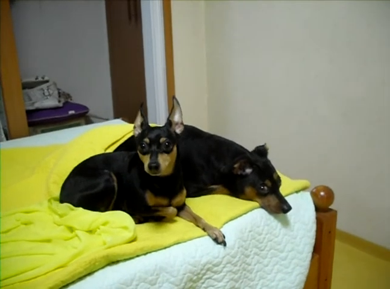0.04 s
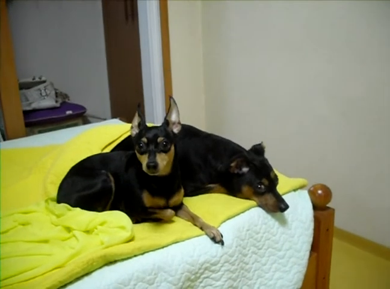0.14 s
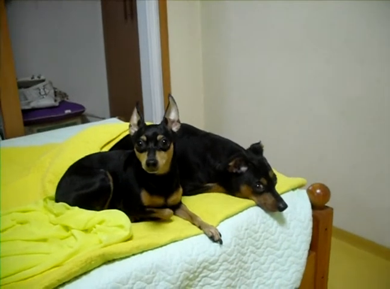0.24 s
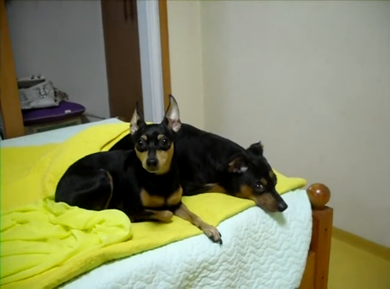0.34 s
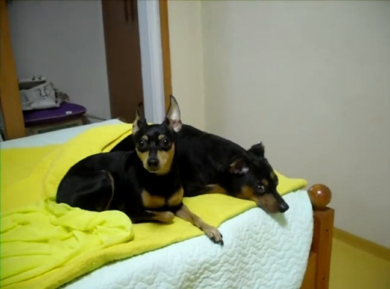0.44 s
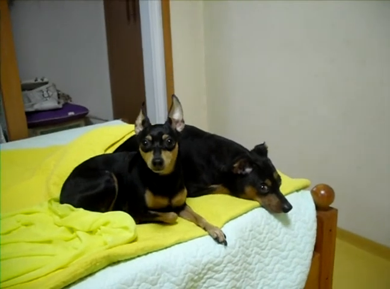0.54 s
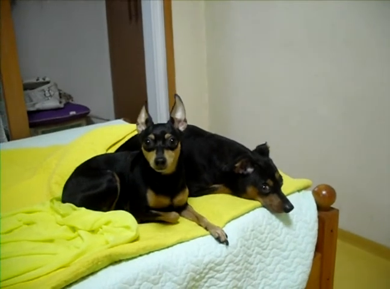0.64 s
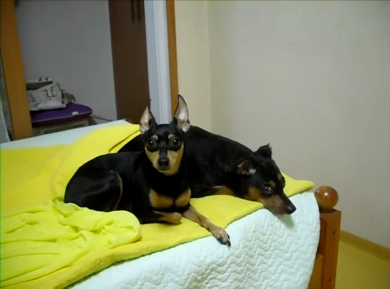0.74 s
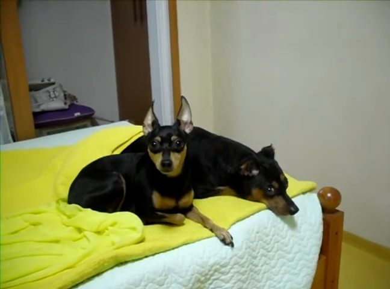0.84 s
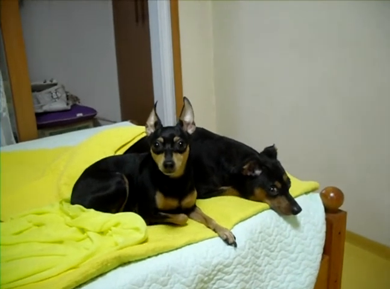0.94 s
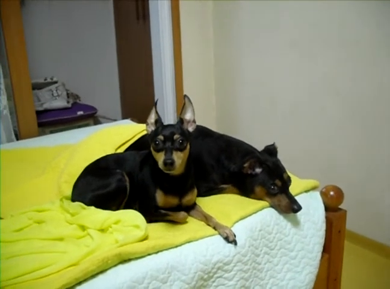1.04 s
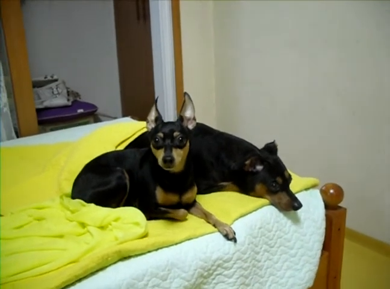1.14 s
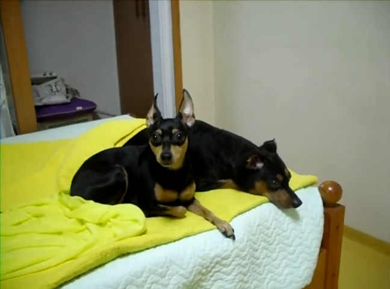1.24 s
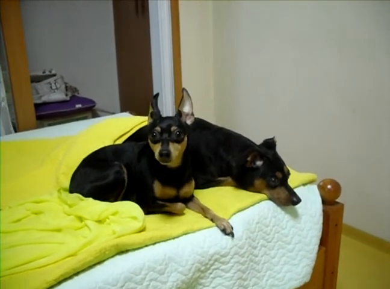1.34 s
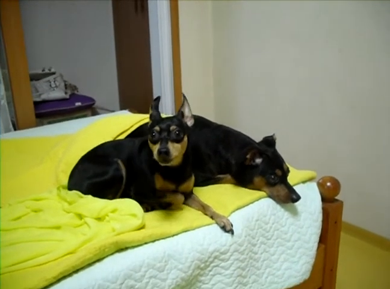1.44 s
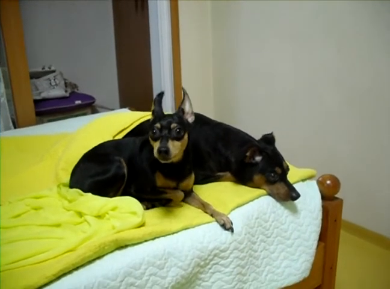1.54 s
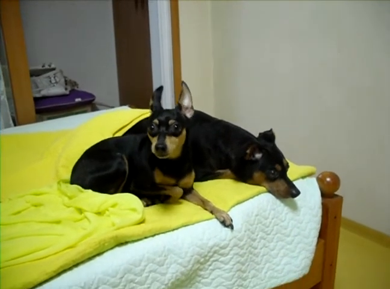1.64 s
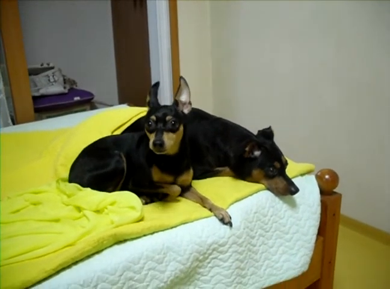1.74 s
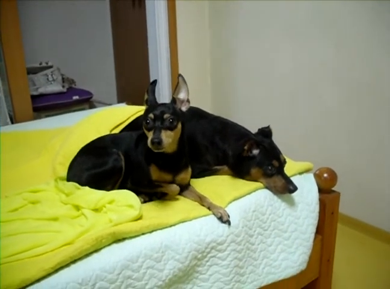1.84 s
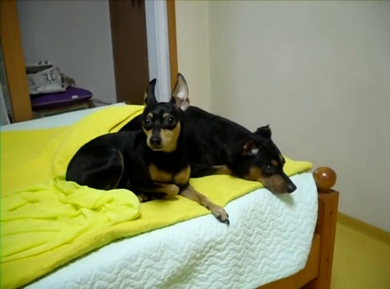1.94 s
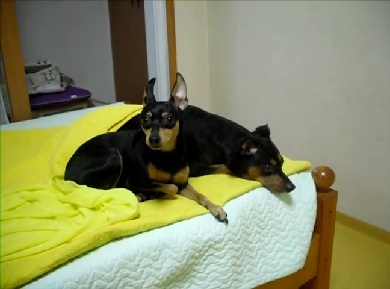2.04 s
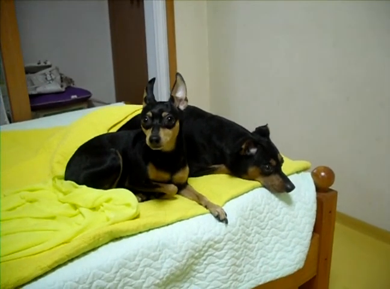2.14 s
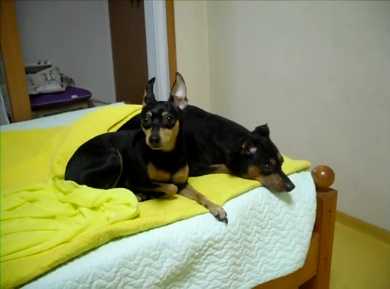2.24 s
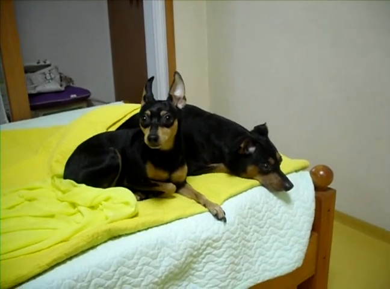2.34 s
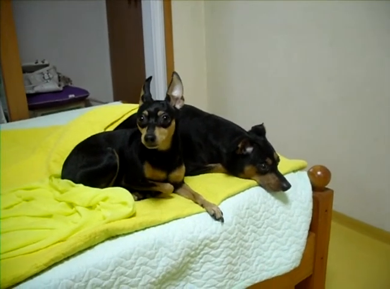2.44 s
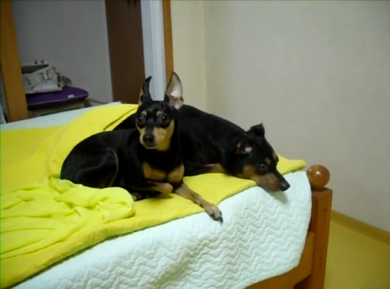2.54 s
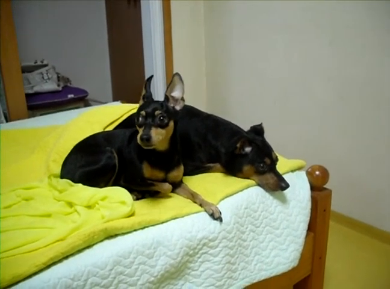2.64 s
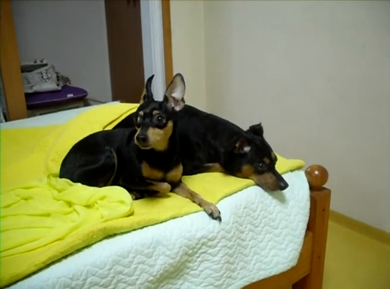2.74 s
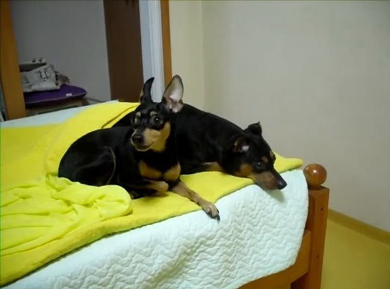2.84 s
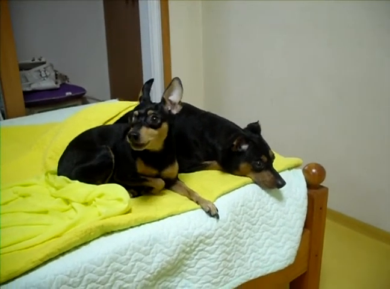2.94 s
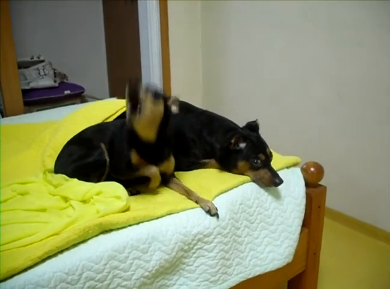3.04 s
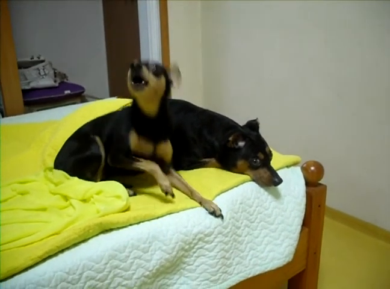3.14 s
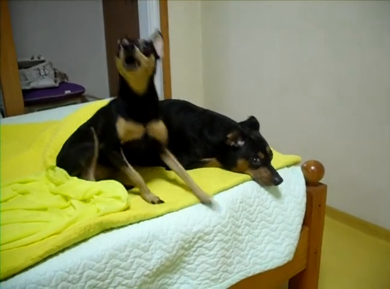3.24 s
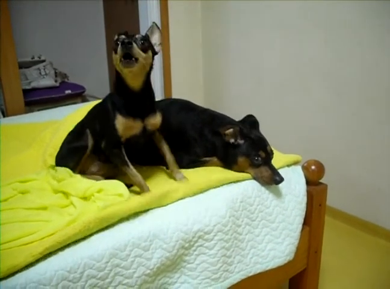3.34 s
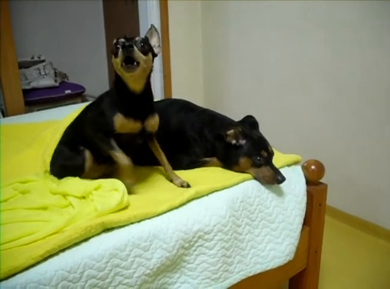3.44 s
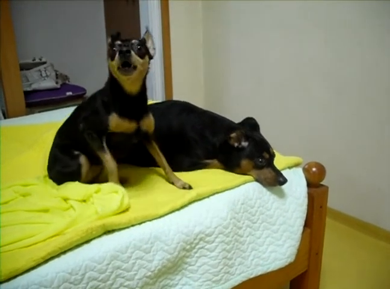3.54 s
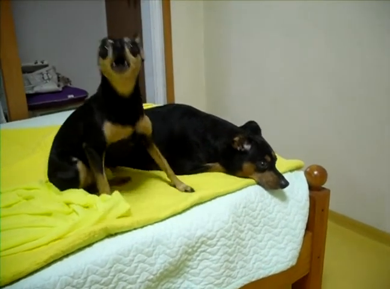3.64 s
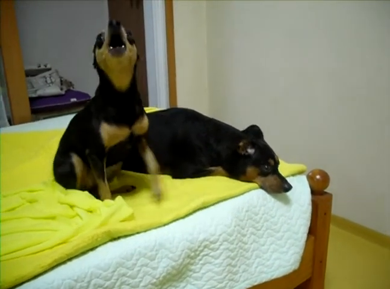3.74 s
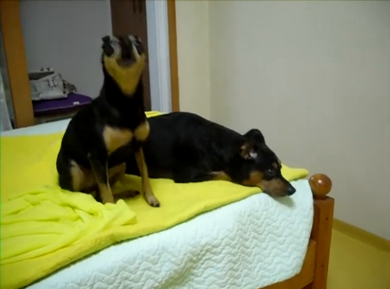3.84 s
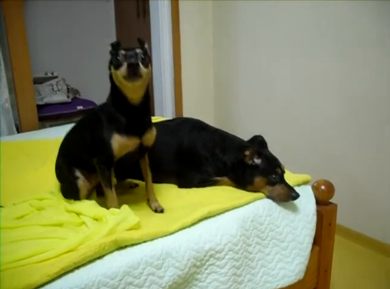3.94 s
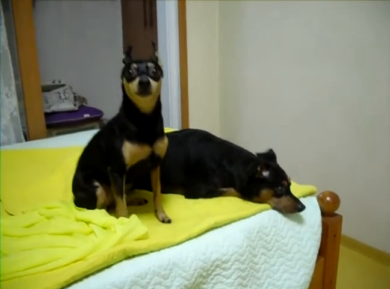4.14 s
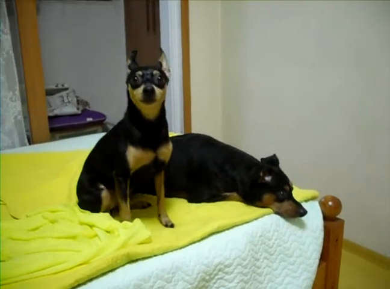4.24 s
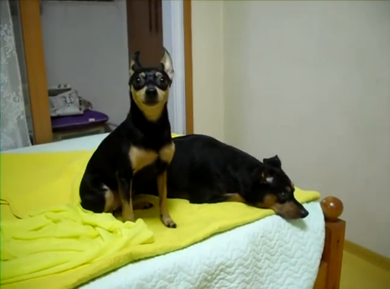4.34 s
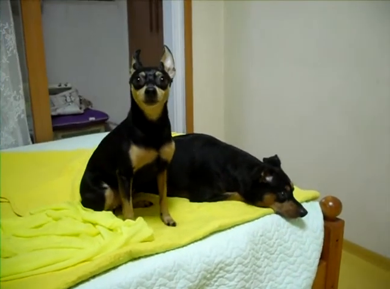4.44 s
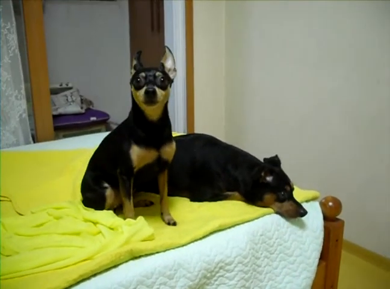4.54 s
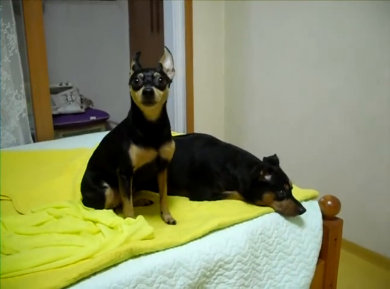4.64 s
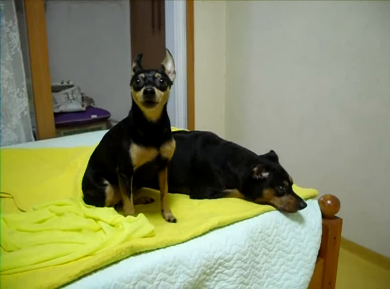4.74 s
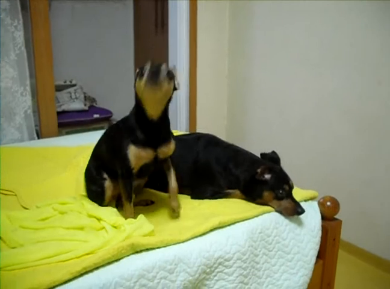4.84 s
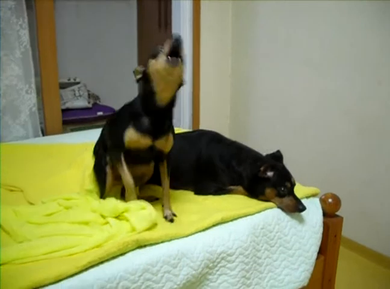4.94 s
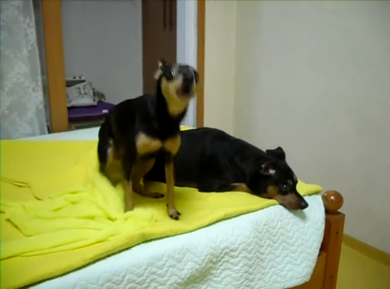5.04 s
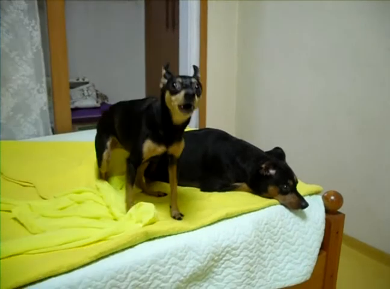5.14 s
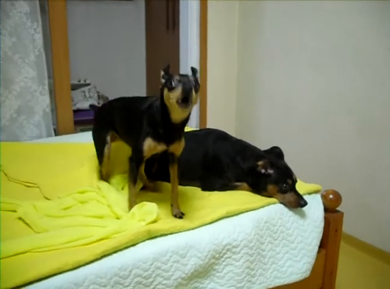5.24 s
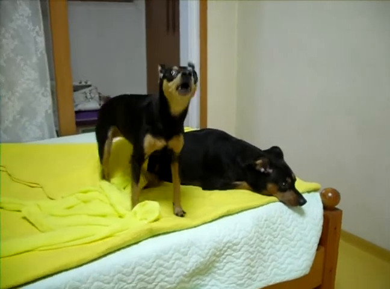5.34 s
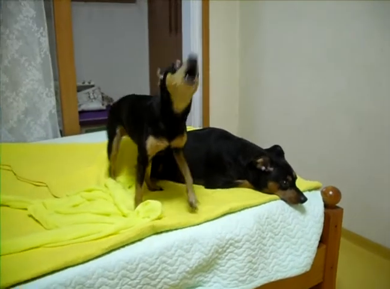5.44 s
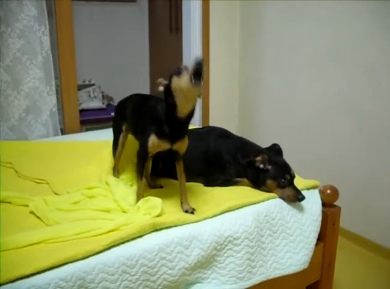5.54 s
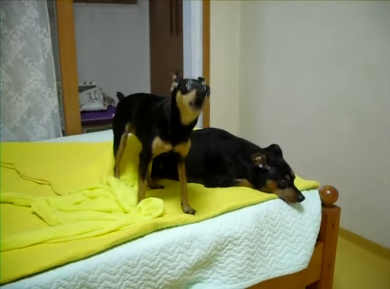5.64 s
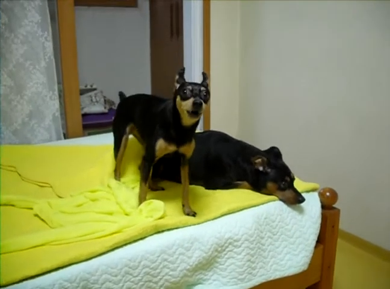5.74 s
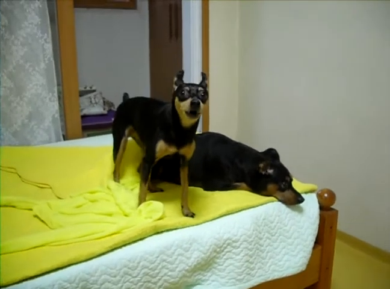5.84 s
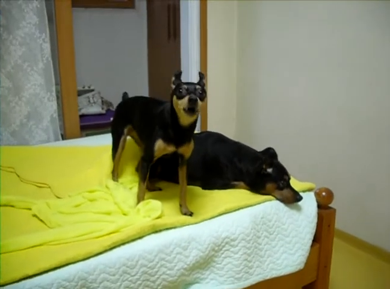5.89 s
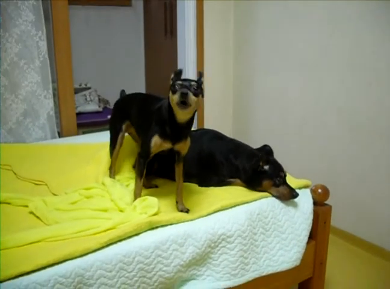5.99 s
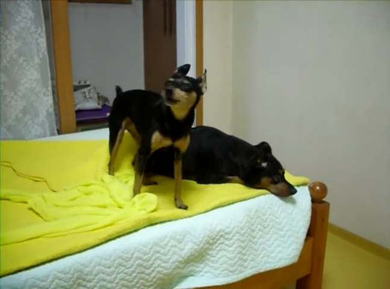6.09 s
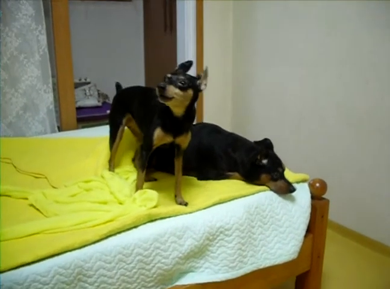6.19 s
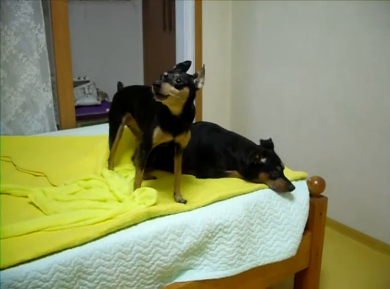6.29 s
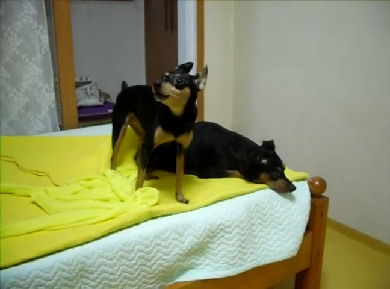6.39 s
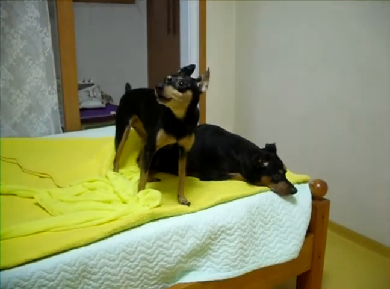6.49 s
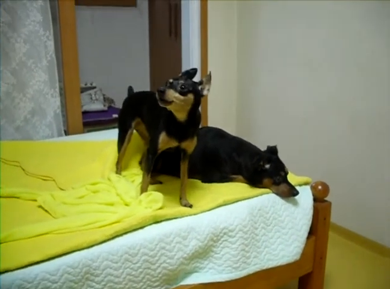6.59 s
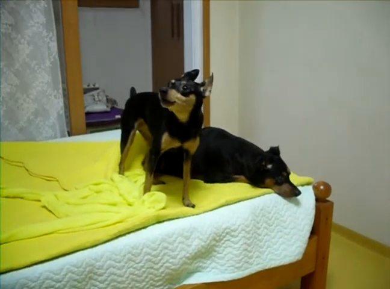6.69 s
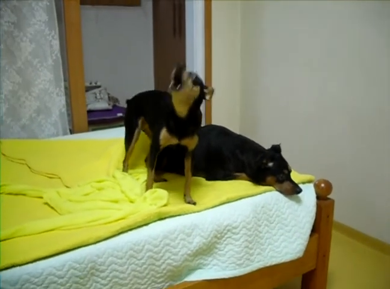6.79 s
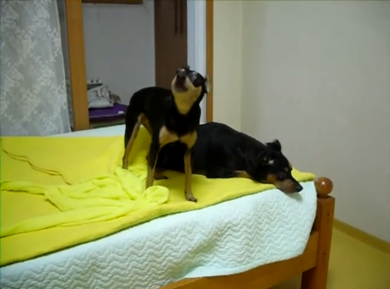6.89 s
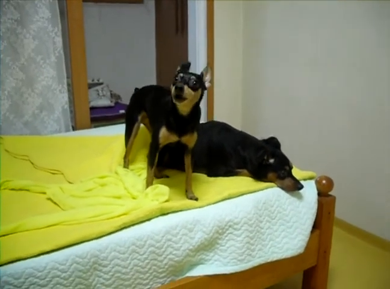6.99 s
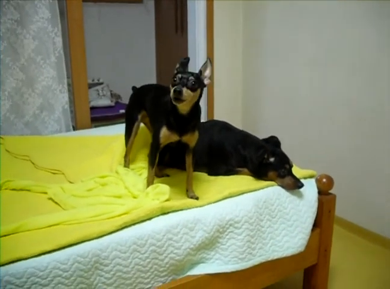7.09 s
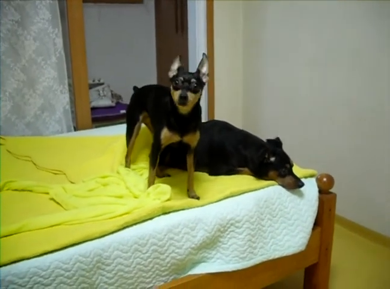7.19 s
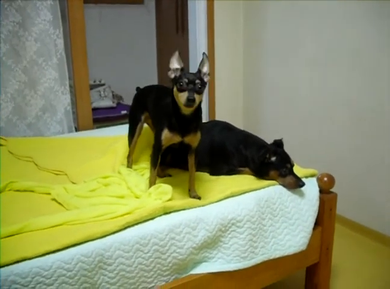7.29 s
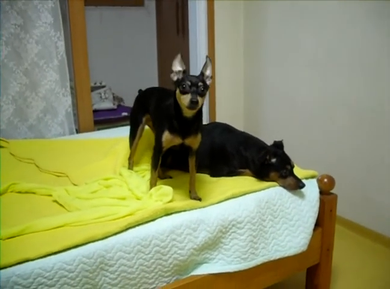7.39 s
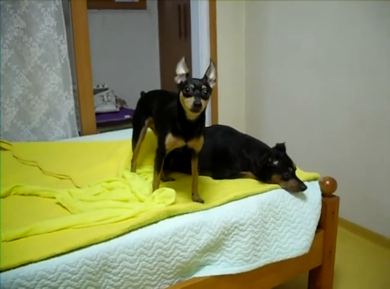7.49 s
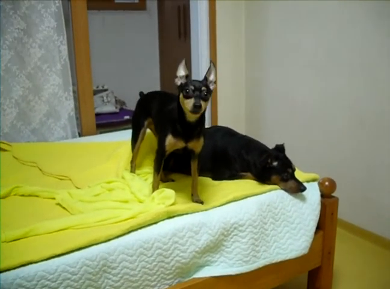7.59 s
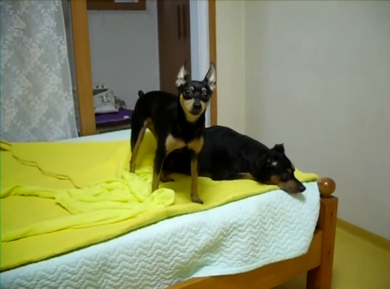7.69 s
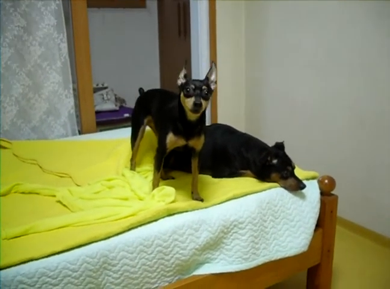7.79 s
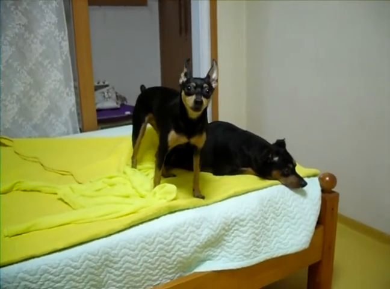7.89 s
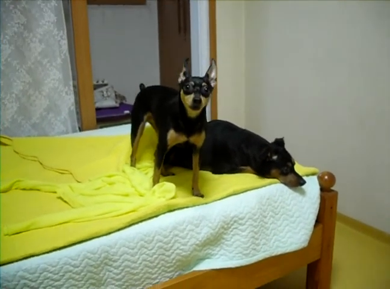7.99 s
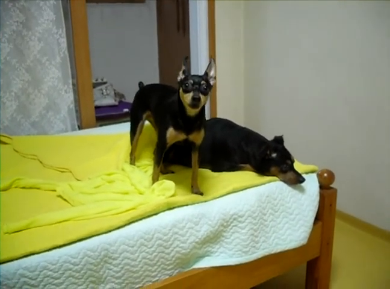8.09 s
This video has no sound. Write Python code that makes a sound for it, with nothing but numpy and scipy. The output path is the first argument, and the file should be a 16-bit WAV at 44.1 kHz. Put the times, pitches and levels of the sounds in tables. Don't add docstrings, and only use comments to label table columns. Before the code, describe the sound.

Soft electronic hiss, low rumble and a barely audible hum run throughout in a small bare bedroom with a short, bright wall echo. At 1.3 seconds a nearby small dog gives a weak, higher yap, then stays quiet. Around 2.8 there are tiny lip ticks and a faint breath, then the loudest bark at 2.9, abrupt, rough and distorted. Two breathy huffs follow at 3.05 and 3.3, then a low hum leaping into a whine and a loud, duller bark at 3.6. A faint tick at 3.9 leads into a pause. A huff at 4.6 precedes a longer bark at 4.75; soft puffs, a short hum and a claw snap follow, then a softer bark at 5.3. Low hums, a rising whine, a sharp snort at 6.0 and a throbbing growl lead to a bark at 6.6. Quiet returns until a last strong bark at 8.05.

```python
import sys
import numpy as np
from scipy import signal
from scipy.io import wavfile
from scipy.ndimage import uniform_filter1d

SR = 44100
rng = np.random.default_rng(int(sys.argv[2]) if len(sys.argv) > 2 else 0)


def file_out(sig):
    cols = np.atleast_2d(sig).T
    lim = np.clip(cols, -1, 1)
    pcm = np.round(lim * 32767).astype(np.int16)
    wavfile.write(sys.argv[1], SR, pcm)


def elevation(decibels):
    levels = np.asarray(decibels, float)
    return 10 ** (levels / 20)


N = 359415

# frequency in Hz, density in dB per Hz.
HISS_SPECTRUM = [(12, -22.5), (20, 0), (38, -4), (54, -18), (121, -15.5), (143, -13.5), (320, -16),
                 (825, -20), (1090, -20.5), (5000, -28), (6500, -61), (11000, -120)]
HISS_DB = -56
HUM_HZ, HUM_DB = 115, -70.5
RUMBLE_HZ, RUMBLE_DB = 27.6, -63

# frequency in Hz, time to fall 60 dB in seconds.
WALL_DECAY = [(150, 0.42), (500, 0.37), (900, .27), (1280, 0.35), (1600, 0.3), (2200, 0.3), (3000, 0.22),
              (4600, 0.33)]

# time in seconds, level in dB, ring in Hz.
TICKS = [
    (2.775, -33, 1470),
    (2.809, -31.5, 2400),
    (2.828, -43.5, 2400),
    (3.879, -37.5, 2500),
    (5.162, -61, 2600),
    (5.196, -31.5, 2000),
]

# start, rise, hold and fall in seconds, effort in dB.
HUFFS = [
    (2.756, 0.039, 0.022, 0.07, -41.5),
    (3.047, 0.065, 0.091, .045, -21.5),
    (3.299, 0.011, 0.036, 0.12, -22.5),
    (4.599, 0.041, 0.043, .085, -26.5),
    (4.963, 0.045, 0.022, 0.14, -33),
    (5.156, .04, 0.0092, 0.17, -32.5),
    (6.037, 0.0102, 0.0044, 0.075, -22),
]
HUFF_MOUTHS_HZ = [1150, 1160, 1150, 1020, 1130, 1150, 1068]
# frequency in Hz, width in Hz, level in dB.
HUFF_THROATS = [
    [(300, 800, 6.5), (2400, 200, -4.5), (4090, 1500, -12.5)],
    [(250, 530, -5.5), (1900, 390, -4.5), (3000, 640, -10), (4950, 550, -6.5)],
    [(250, 400, -5.5), (1570, 430, -6), (2880, 580, -3), (5100, 170, -7.5)],
    [(200, 100, -1.5), (2150, 660, -4), (4915, 200, -4.5)],
    [(250, 430, -4.5), (2000, 180, -9.5), (4600, 900, -10.5)],
    [(320, 310, 3.5), (1530, 130, 7), (2800, 250, -11), (5147, 900, -16)],
    [(450, 190, -4.5), (1650, 240, -8.5), (2600, 820, -4.5), (5270, 870, -13)],
]
# frequency in Hz, width in Hz, level in dB.
NOSTRILS = (660, 270, -5.5)
PUFF_BRIGHT_DB = (-1.5, -3, -5, -12, -10)
PUFF_START_DB, PUFF_KNEE_SHARE, PUFF_KNEE_DB, PUFF_END_DB = -10.5, .35, -7, -15.5

# time in seconds, effort in dB, pitch in Hz.
GROWLS = [
    [(3.35, -43, 220), (3.39, -29, 222), (3.5, -44.5, 218.9), (3.515, -43, 230), (3.543, -20, 338.3),
     (3.558, -19.5, 370.5), (3.58, -18.5, 402)],
    [(4.95, -39, 280), (4.99, -25.5, 290.4), (5.05, -27.5, 278), (5.11, -53, 280)],
    [(5.52, -37, 199), (5.55, -30.5, 212.2), (5.6, -36.5, 210), (5.68, -67, 200)],
    [(5.7, -44.5, 163), (5.785, -36.5, 183.3), (5.8, -38, 315), (5.84, -26.5, 341), (5.92, -38, 367.6),
     (5.955, -43, 255)],
    [(5.945, -40, 250), (6.02, -34.5, 212), (6.2, -40, 187), (6.33, -39, 206.8), (6.378, -50.5, 205),
     (6.395, -39, 190), (6.45, -33, 173), (6.53, -37.5, 179), (6.63, -35.5, 168)],
]
# mouth over pitch (ratio), widest mouth in Hz, roughness 0-1, brightness in dB.
MUZZLES = [(2, 1080, 0.3, -18), (2.02, 600, .06, -27), (2.95, 620, 0.4, -27), (3.5, 1063, 0.3, -27),
           (2.87, 546, .27, -22)]
# frequency in Hz, width in Hz, level in dB.
CHESTS = [(230, 300, 1), (280, 332, -16), (250, 190, -11), (315, 200, 0.5), (195, 120.8, 3)]
# frequency in Hz, width in Hz, level in dB.
GROWL_THROAT = [(910, 300, 14.5), (2800, 350, -9), (4820, 900, -14.5)]
LOW_GROWL_HZ, BRIGHT_DB_PER_OCTAVE = 200, 19

# start, attack and hold in seconds, effort in dB, brightness in dB.
BARKS = [
    (1.288, 0.037, 0.02, -11.5, -2.5),
    (2.869, 0.038, .085, 11, -12),
    (3.571, 0.024, .082, 7, -15.5),
    (4.747, .036, .11, 2.5, -9),
    (5.321, 0.037, .085, 0.5, -9),
    (6.619, .05, .088, 2, -13),
    (8.04, 0.046, .1, 4, -7),
]
# time in seconds, mouth resonance in Hz, roughness 0-1.
JAWS = [
    [(1.292, 250, .0), (1.318, 479.2, 0.11), (1.33, 648.7, 0.46), (1.34, 784, 0.48), (1.355, 624, 0.46)],
    [(2.864, 450, .35), (2.892, 1415, 0.5), (2.96, 1329, 0.4), (2.972, 1386, .08), (2.995, 1407, .08),
     (3.006, 1300, .25), (3.05, 1265, .2)],
    [(3.578, 836.7, 0.37), (3.595, 931.5, .2), (3.618, 1064, 0.28), (3.632, 1300, 0.31), (3.662, 1385, 0.1),
     (3.682, 1260, .13)],
    [(4.75, 450, .45), (4.782, 1194, .52), (4.815, 1020, 0.4), (4.852, 1497, .52), (4.868, 1250, 0.2),
     (4.94, 1301, 0.4)],
    [(5.322, 755.7, .45), (5.343, 930.6, 0.3), (5.385, 945, .5), (5.405, 1067, 0.6), (5.445, 921.8, 0.3),
     (5.49, 998.5, .3)],
    [(6.625, 541.4, .33), (6.668, 937.2, .35), (6.70, 1010, .35), (6.718, 1199, .42), (6.742, 1020, .36),
     (6.785, 864.3, .33)],
    [(8.035, 623.8, .3), (8.07, 1027, 0.5), (8.11, 1050, .33), (8.15, 932, 0.4)],
]
LOCKED_OVERTONES = [1, 4, 3, 4, 3, 3, 3]
# highest pitch in Hz, effort part-way up the attack in dB, tail after the hold in dB, tail in seconds.
FOLDS = [(820, -7, -17, 0.043), (358, -15.5, -13.5, .03), (352.7, -12.5, -14, 0.075),
         (318.8, -12.5, -16.5, .02), (326, -11, -9.5, 0.039), (393.7, -11.5, -13, 0.049),
         (350, -6.5, -12, .04)]
# frequency in Hz, width in Hz, level in dB.
BARK_THROATS = [
    [(1250, 310, 5), (1790, 180, 5), (2600, 72, -8), (4260, 18000, -26.5)],
    [(1050, 220, 10.5), (1846, 100, -2.5), (2600, 240, -2), (4000, 670, -12.5)],
    [(1705, 200, 5.5), (2297, 310, 7), (3920, 1700, -10)],
    [(1070, 80, 12), (1800, 580, -2.5), (2300, 250, -7.5), (3940, 2000, -21)],
    [(1300, 220, 4), (1887, 290, 6.5), (2674, 450, -1.5), (4530, 1100, -17)],
    [(1250, 160, 5.5), (1855, 520, 4.5), (2430, 350, -2.5), (3680, 4500, -18.5)],
    [(650, 92, -5), (1300, 390, 0), (1970, 510, -7), (2420, 390, -8), (4070, 670, -22.5)],
]
# frequency in Hz, width in Hz, level in dB.
CHEEKS = (1730, 900, -9.5)
START_DB, KNEE_SHARE, SAG_DB = -36, .62, -2
DROP_S, TAIL_SAG_DB, END_S, END_SAG_DB = 0.017, -6, 0.016, -27
LOWEST_HZ = 234.84
ROUGH_BRIGHT_DB, USUAL_ROUGH, SHUT_BRIGHT_DB = 47.5, 0.4, -13

DOG_DB, ECHO_DB = -4.5, -7.5
EDGE_HZ, OVERLOAD, CEILING = 6400, 0.65, 0.67


def evened(x):
    return x / np.sqrt(np.mean(x ** 2) + 1e-20)


def read(points, hz):
    f, value = np.transpose(points)
    return np.interp(np.log(hz + 1), np.log(f + 1), value)


def curves(rows):
    s, *columns = np.transpose(rows)
    t = np.arange(s[0], s[-1], 1 / SR)
    return round(s[0] * SR), [np.interp(t, s, c) for c in columns]


def joined(*controls):
    first = controls[0][0]
    s = np.concatenate([times for times, _ in controls])
    s = np.unique(np.clip(s, first[0], first[-1]))
    return s, [np.interp(s, *c) for c in controls]


def add(mix, start, sound):
    part = mix[start:][:len(sound)]
    part += sound[:len(part)]


def wander(noise, seconds):
    size = max(int(seconds * SR), 2)
    return evened(uniform_filter1d(uniform_filter1d(noise, size), size))


def resonate(x, hz, width_hz):
    turn = np.exp(2j * np.pi * np.cumsum(hz * np.ones(len(x))) / SR)
    r = np.exp(-np.pi * width_hz / SR)
    smooth = signal.lfilter([(1 - r) ** 2], [1, -2 * r, r * r], x / turn)
    return 2 * (turn * smooth).real


def hiss():
    frames, hz = N // 256 + 5, np.fft.rfftfreq(1024, 1 / SR)
    real, imag, patches = rng.standard_normal((frames, 513, 3)).T
    patches = evened(uniform_filter1d(uniform_filter1d(patches, 6, 0), 14, 1))
    level_db = read(HISS_SPECTRUM, np.minimum(hz, 5000))[:, None] + 1.4 * patches
    noise = signal.istft((real + 1j * imag) * elevation(level_db), nperseg=1024, noverlap=768)[1][:N]
    return elevation(HISS_DB) * evened(noise)


def house():
    hum = evened(resonate(rng.standard_normal(N), HUM_HZ, 4.4))
    rumble = evened(resonate(rng.standard_normal(N), RUMBLE_HZ, 25))
    return elevation(HUM_DB) * hum + elevation(RUMBLE_DB) * rumble


def bedroom(x):
    taps = np.zeros(SR)
    at = np.arange(150, SR - 20, 20)
    taps[at + rng.integers(0, 20, len(at))] = rng.choice([-1., 1.], len(at))
    hz, t, z = signal.stft(taps, SR, nperseg=256)
    decay_db = -60 * t / read(WALL_DECAY, hz)[:, None]
    tail = signal.istft(z * elevation(decay_db), SR, nperseg=256)[1]
    tail = signal.lfilter(*signal.butter(2, 300, "high", fs=SR), tail)
    return signal.fftconvolve(x, tail / np.linalg.norm(tail))[:N]


def tick(start_s, level_db, hz):
    t = np.arange(400) / SR
    ring = np.sin(2 * np.pi * hz * t) * np.exp(-t / .0015)
    burst = rng.standard_normal(400) * np.exp(-t / .0008)
    return round(start_s * SR), elevation(level_db) * (ring + burst)


def throat(drive, effort_db, mouth_hz, bright_db, mouth_width_hz, upper, low):
    high = 0
    for k, (hz, width_hz, db) in enumerate(upper):
        high = high + (-1) ** k * elevation(db) * resonate(drive, hz, width_hz)
    mouth = resonate(resonate(drive, mouth_hz, 2 * mouth_width_hz), mouth_hz, mouth_width_hz)
    low_hz, low_width_hz, low_db = low
    out = mouth - elevation(bright_db) * high - elevation(low_db) * resonate(drive, low_hz, low_width_hz)
    level = np.sqrt(uniform_filter1d(out ** 2, size=900) + 1e-9)
    return elevation(effort_db) * out / level * signal.windows.tukey(len(out), .05)


def puff(row, mouth_hz):
    start, rise, hold, fall, effort_db = row
    s = start + np.cumsum([0, rise, hold, PUFF_KNEE_SHARE * fall, (1 - PUFF_KNEE_SHARE) * fall])
    level_db = effort_db + np.array([PUFF_START_DB, 0, 0, PUFF_KNEE_DB, PUFF_END_DB])
    return np.transpose([s, level_db, mouth_hz + 0 * s, PUFF_BRIGHT_DB])


def huff(rows, upper):
    start, (effort_db, mouth_hz, bright_db) = curves(rows)
    air, chance = rng.standard_normal((2, SR))[:, :len(mouth_hz)]
    grain = elevation(2.5 * wander(chance, .003))
    teeth = (3360, 4900, -18.5)  # Hz, width Hz, dB
    return start, grain * throat(air, effort_db, mouth_hz, bright_db, 380, upper + [teeth], NOSTRILS)


def voice(rows, upper, low, mouth_width_hz, jitter, throb_db):
    start, (effort_db, hz, rough, mouth_hz, bright_db) = curves(rows)
    pitch_drift, pulse_drift, air, beat_drift = rng.standard_normal((4, SR))[:, :len(hz)]
    rough = np.clip(rough, 0, 1)
    turns = np.cumsum(hz * (1 + jitter * rough * wander(pitch_drift, .003))) / SR
    folds = sum(np.cos(2 * np.pi * k * turns) * (k * hz < 5500) for k in range(1, 24))
    folds = evened(folds) * elevation(7.0 * rough * wander(pulse_drift, .005))
    puffs = (.5 + np.exp(-(turns % 1) / .3)) * resonate(air, 2000, 9000)
    drive = (1 - rough) * folds + rough * evened(puffs)
    drive = signal.lfilter(*signal.butter(2, 110, "high", fs=SR), drive)
    beats = np.cumsum(31 * (1 + .3 * wander(beat_drift, .05))) / SR
    throb = elevation(throb_db * np.sin(2 * np.pi * beats))
    return start, throb * throat(drive, effort_db, mouth_hz, bright_db, mouth_width_hz, upper, low)


def growl(rows, ratio, widest_hz, rough, bright_db):
    s, effort_db, hz = np.transpose(rows)
    bright_db = bright_db + BRIGHT_DB_PER_OCTAVE * np.log2(hz / LOW_GROWL_HZ)
    return np.transpose([s, effort_db, hz, rough + 0 * s, np.minimum(ratio * hz, widest_hz), bright_db])


def bark(row, jaw, overtone, folds):
    start, attack, hold, effort_db, bright_db = row
    top_hz, knee_db, tail_db, tail = folds
    times = start + np.cumsum([0, KNEE_SHARE * attack, (1 - KNEE_SHARE) * attack, hold, DROP_S, tail, END_S])
    shape_db = np.array([START_DB, knee_db, 0, SAG_DB, tail_db, tail_db + TAIL_SAG_DB, tail_db + END_SAG_DB])
    at, mouth_hz, rough = np.transpose(jaw)
    shut = (times[[0, 2]], [1, 0])
    s, (level_db, mouth_hz, rough, shut) = joined(
        (times, effort_db + shape_db), (at, mouth_hz), (at, rough), shut)
    bright_db = bright_db + ROUGH_BRIGHT_DB * (rough - USUAL_ROUGH) + SHUT_BRIGHT_DB * shut
    hz = np.clip(mouth_hz / overtone, LOWEST_HZ, top_hz)
    return np.transpose([s, level_db, hz, rough, mouth_hz, bright_db])


def scene():
    floor = hiss() + house()
    dog = np.zeros(N)
    for row in TICKS:
        add(dog, *tick(*row))
    for row, mouth_hz, upper in zip(HUFFS, HUFF_MOUTHS_HZ, HUFF_THROATS):
        add(dog, *huff(puff(row, mouth_hz), upper))
    for rows, muzzle, chest in zip(GROWLS, MUZZLES, CHESTS):
        add(dog, *voice(growl(rows, *muzzle), GROWL_THROAT, chest, 330, .12, 3.5))
    for *call, upper in zip(BARKS, JAWS, LOCKED_OVERTONES, FOLDS, BARK_THROATS):
        add(dog, *voice(bark(*call), upper + [CHEEKS], (500, 400, -36), 360, .09, .1))
    return (elevation(DOG_DB) * dog + elevation(ECHO_DB) * bedroom(dog) + floor)[None]


def band_limit(x):
    return signal.sosfilt(signal.butter(12, 16670, fs=SR, output="sos"), x)


def record(dry):
    band = signal.firwin(101, min(EDGE_HZ, SR / 8), window=("kaiser", 8.0), fs=SR)
    slow = np.clip(signal.resample_poly(dry, 1, 4, axis=1), -OVERLOAD, OVERLOAD)
    full = signal.resample_poly(slow, 4, 1, axis=1, window=band)[:, :N]
    return band_limit(np.clip(full, -CEILING, CEILING))


dry = scene()
out = record(dry)
file_out(out)
```